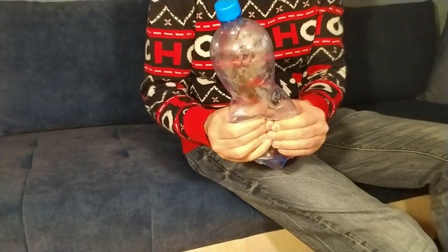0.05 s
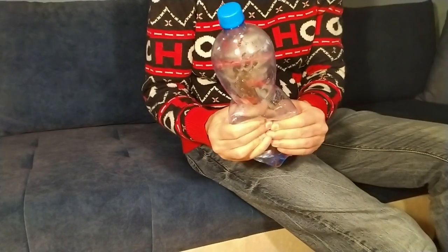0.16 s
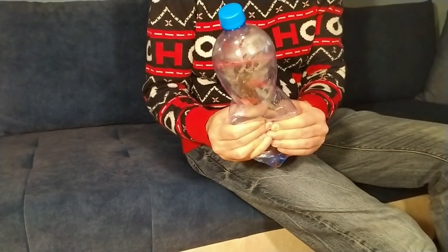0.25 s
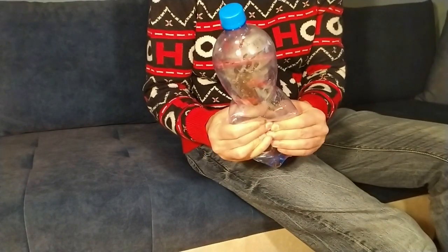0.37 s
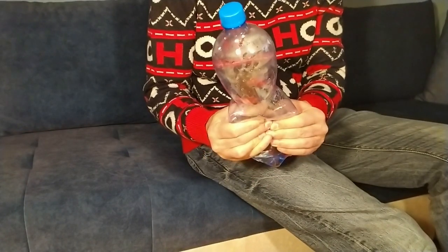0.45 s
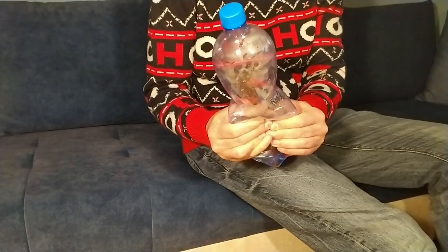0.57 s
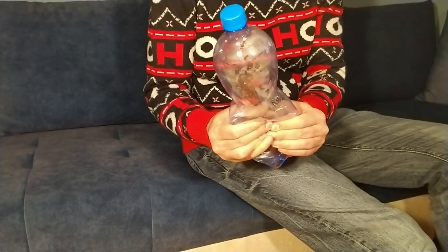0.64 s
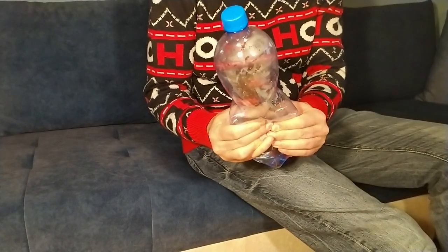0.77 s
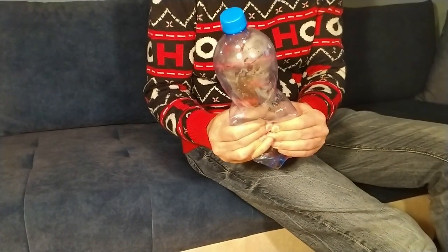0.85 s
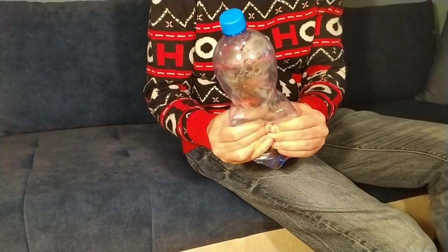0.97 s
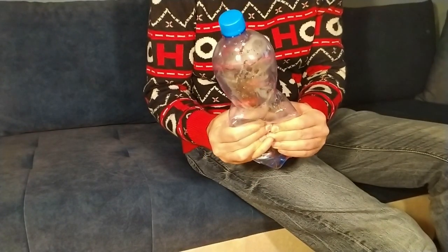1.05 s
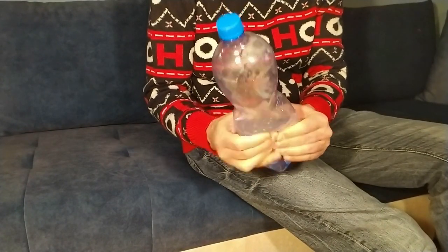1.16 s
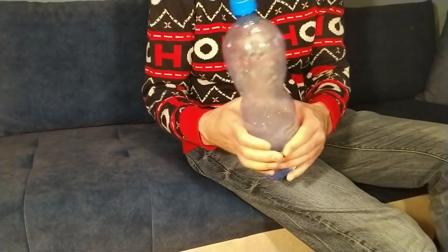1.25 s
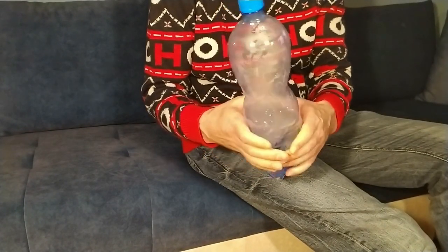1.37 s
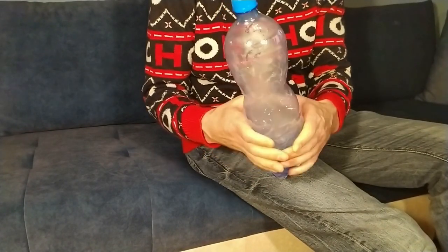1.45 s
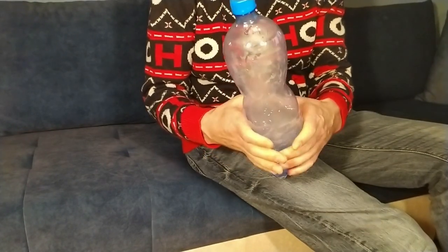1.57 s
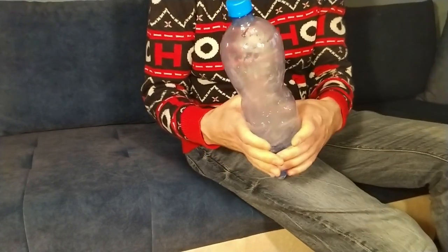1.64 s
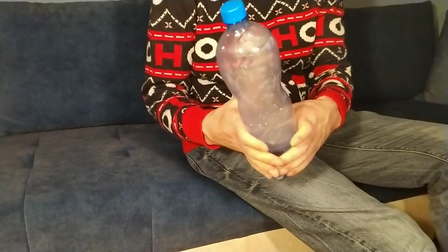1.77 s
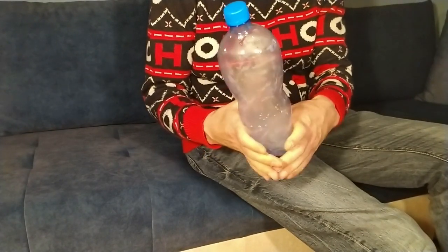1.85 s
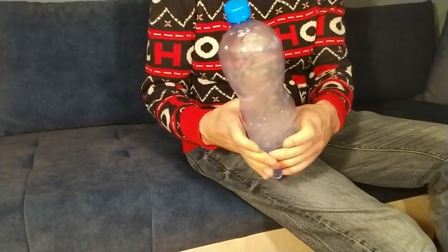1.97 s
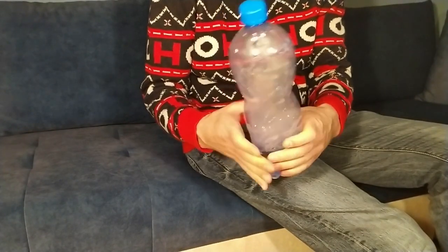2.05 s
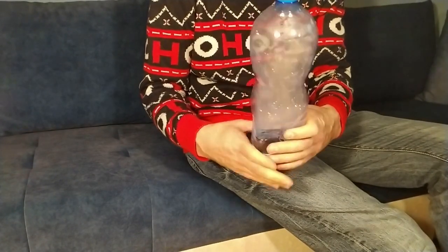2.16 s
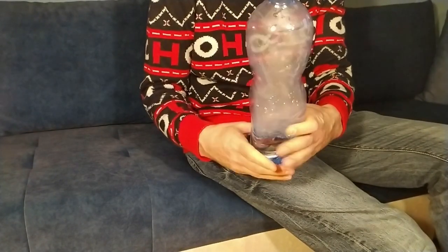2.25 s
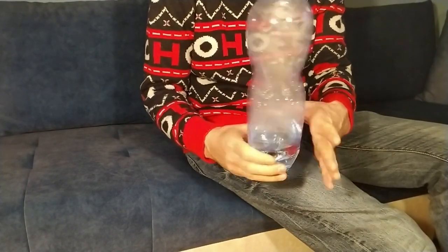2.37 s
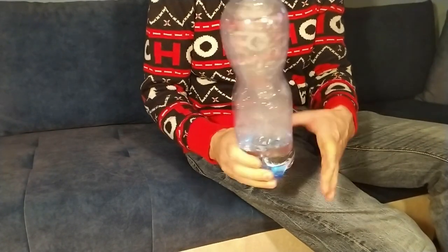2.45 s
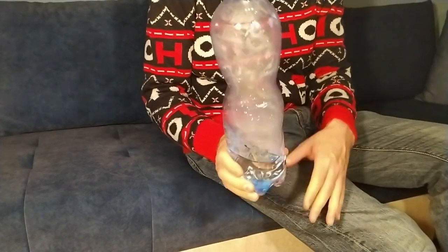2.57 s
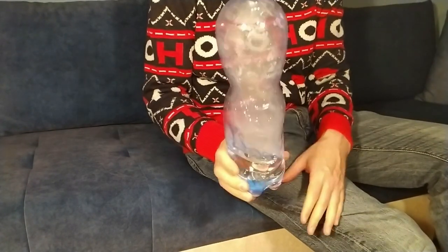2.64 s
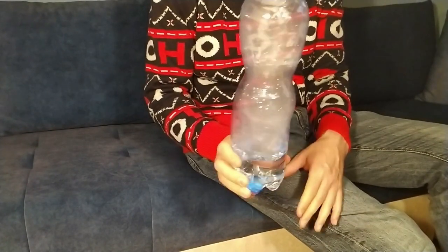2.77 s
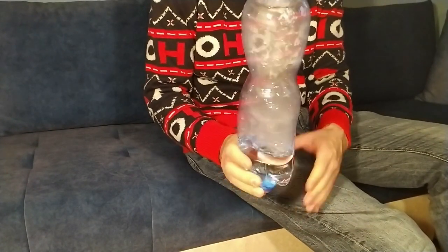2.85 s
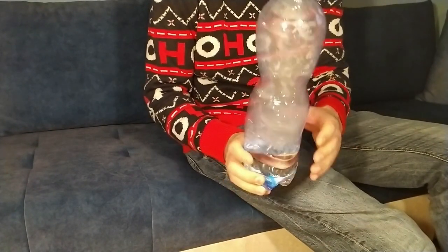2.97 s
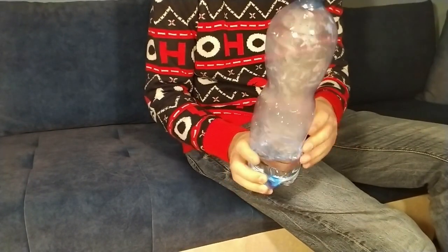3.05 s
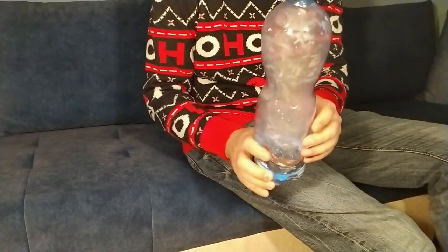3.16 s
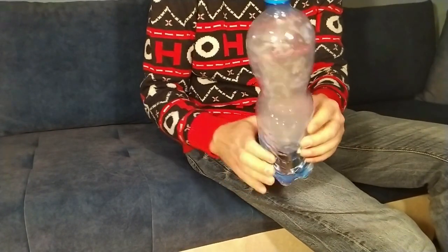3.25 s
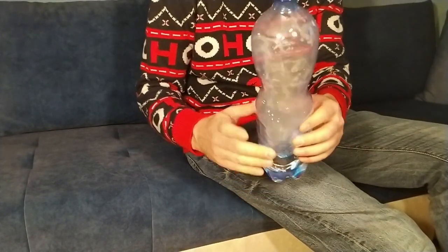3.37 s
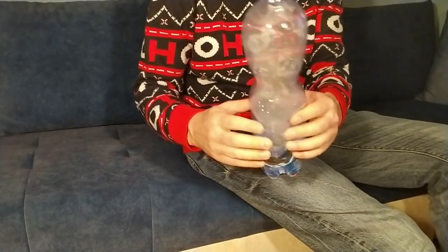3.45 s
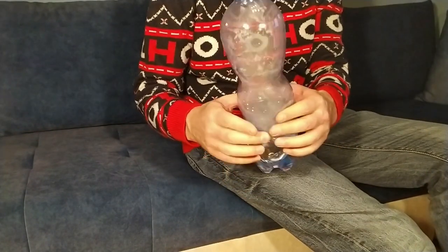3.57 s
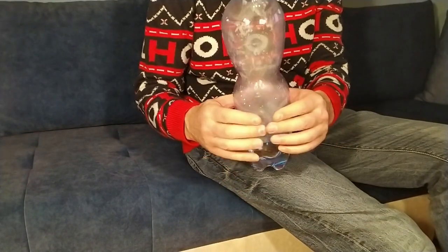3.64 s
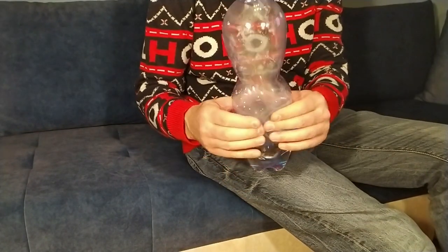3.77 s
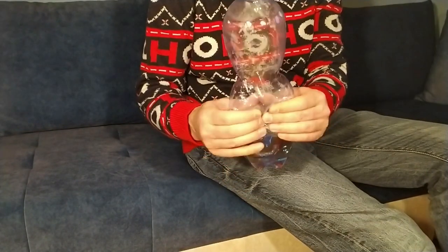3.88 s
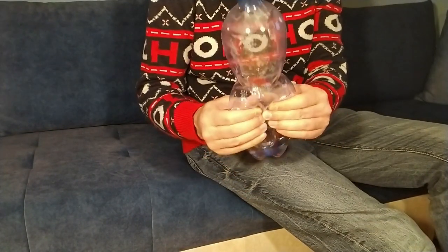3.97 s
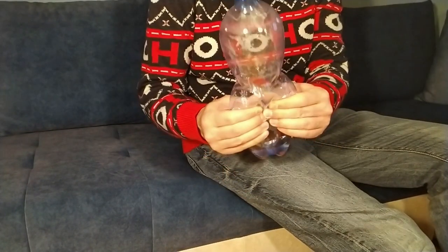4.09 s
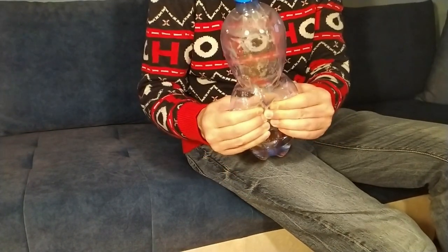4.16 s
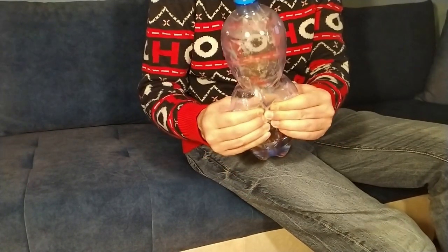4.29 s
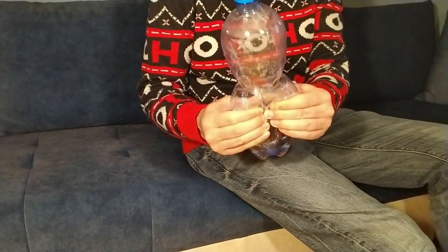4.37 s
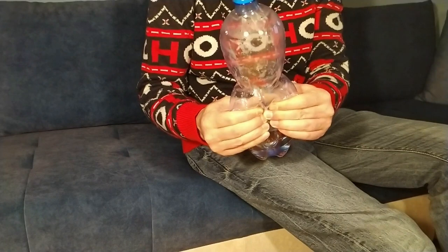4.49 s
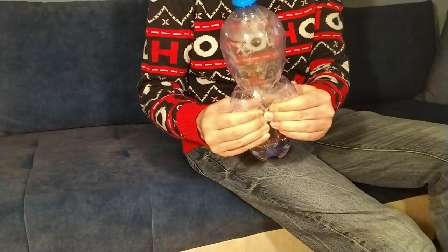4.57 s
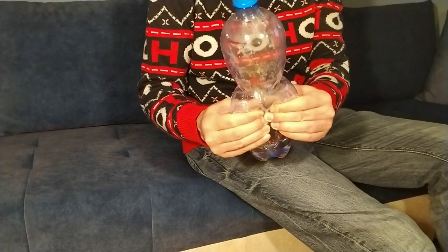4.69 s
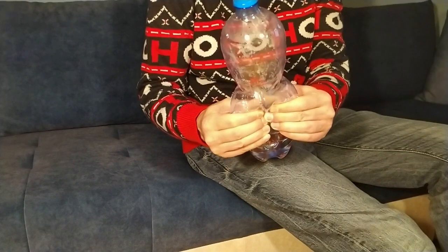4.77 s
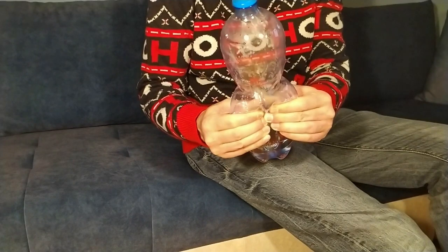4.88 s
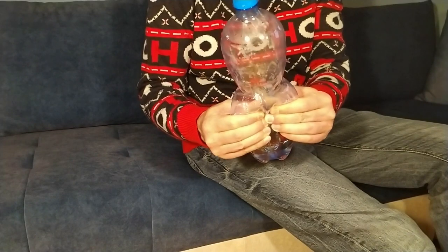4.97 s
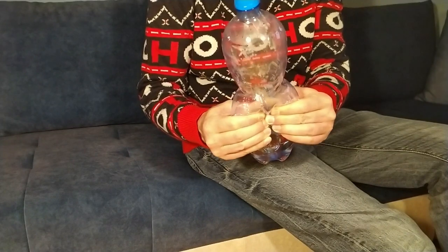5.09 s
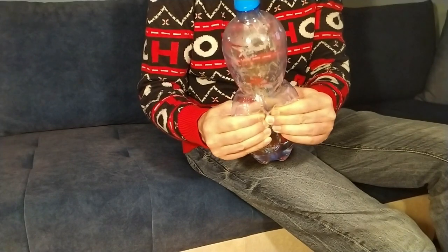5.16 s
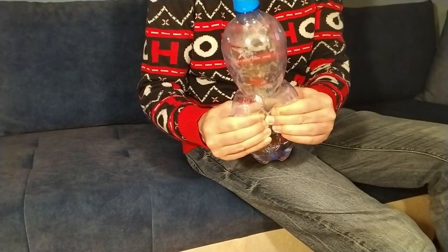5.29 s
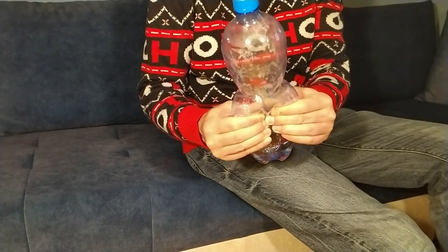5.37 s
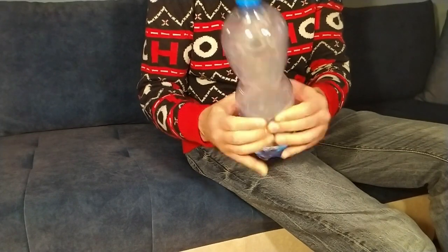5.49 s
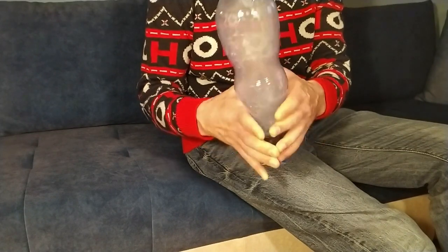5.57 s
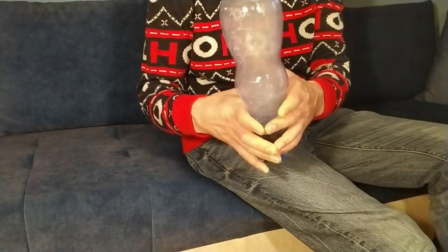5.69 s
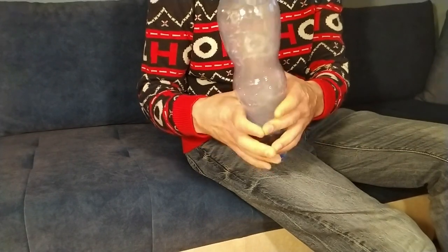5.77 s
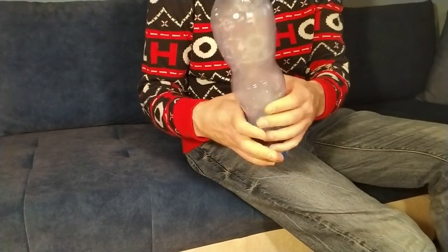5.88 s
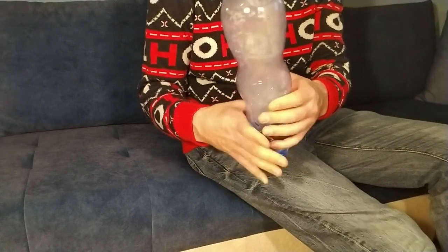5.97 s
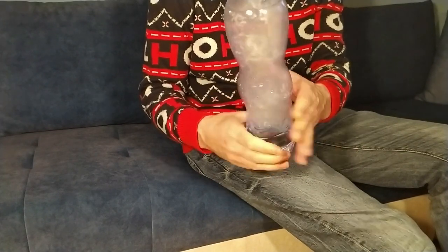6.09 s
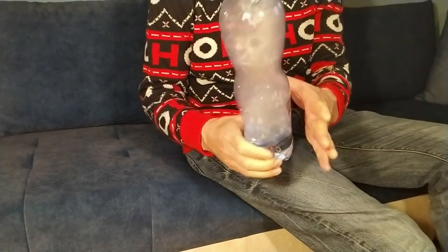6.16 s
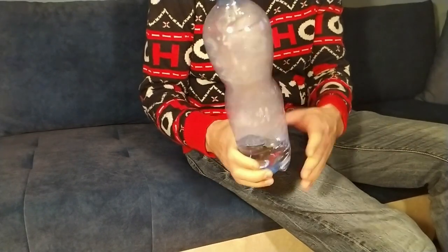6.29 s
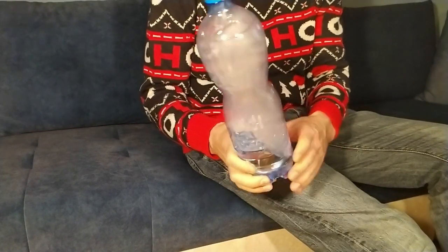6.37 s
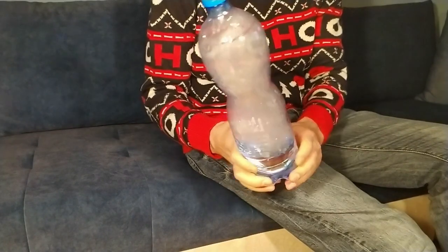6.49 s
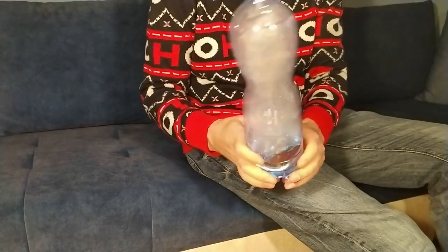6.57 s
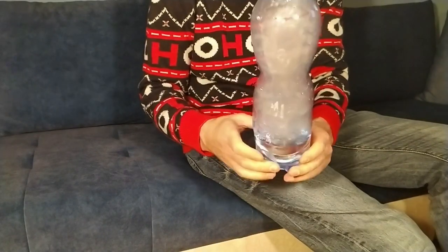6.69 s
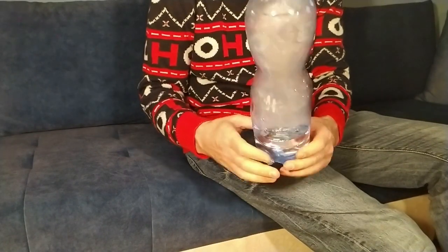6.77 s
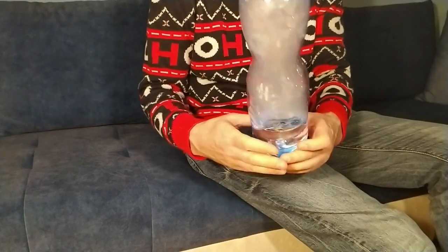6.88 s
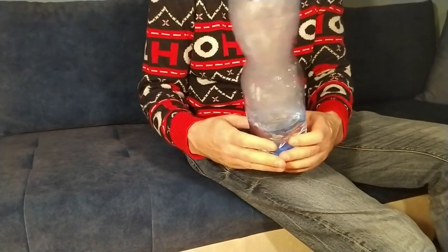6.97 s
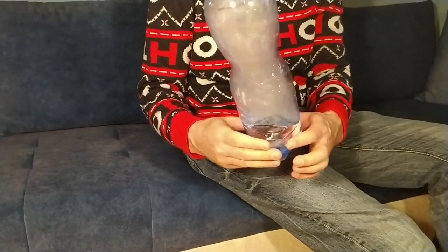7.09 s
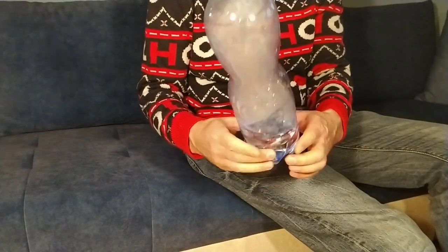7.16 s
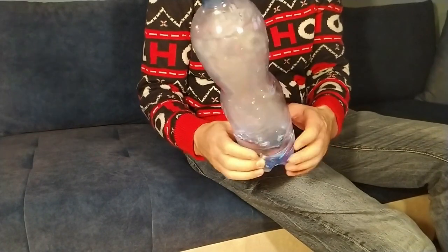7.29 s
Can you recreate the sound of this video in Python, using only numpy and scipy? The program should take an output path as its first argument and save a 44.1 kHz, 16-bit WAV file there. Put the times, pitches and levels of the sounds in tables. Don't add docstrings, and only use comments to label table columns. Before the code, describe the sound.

A thin plastic bottle is worked by two hands in a small furnished room, about a metre from stereo microphones. It starts mid-squeeze with sharp cracks and knocks at 0-0.17 seconds, then near silence with faint rumble and hiss. At 1.2-1.36 a dense, loud burst of bright snaps, ringing plastic and hollow thumps springs out; a second, deeper popping cluster comes at 1.82-2.07. From 2.3 to 3.1 only faint taps, ticks and skin rubs. The second squeeze cracks at 3.25, then crunches quickly through 3.65-4.02, with small ticks to 4.18. A quiet hold follows, with a soft rub near 4.47. At 5.5-5.64 a tight, very loud release crackles and booms, ending on a piercing snap. Light ticks and taps scatter from 5.9 to 7.0, then one sharp late pop at 7.07 and a smaller click at 7.23. Each burst leaves a short bright room tail.

```python
import sys
import numpy as np
from scipy import signal
from scipy.fft import rfft, irfft, next_fast_len
from scipy.io import wavfile

SR = 44100
rng = np.random.default_rng(int(sys.argv[2]) if len(sys.argv) > 2 else 0)


def ratio(d):
    e = np.asarray(d, float) / 20
    return 10 ** e


def to_wav(s):
    ch = np.atleast_2d(s).T
    pcm = np.round(np.clip(ch, -1, 1) * 32767)
    wavfile.write(sys.argv[1], SR, pcm.astype(np.int16))


N = 323253


def along(points, hz):
    f, v = np.transpose(points)
    return np.interp(np.log(hz + 1), np.log(f + 1), v)


def filtered(x, response):
    n = x.shape[-1]
    m = next_fast_len(n + 8192)
    return irfft(rfft(x, m) * response(np.fft.rfftfreq(m, 1 / SR)), m)[..., :n]


def paired(pair, alike):
    def mid_side_gain(hz):
        turn = np.arccos(np.clip(along(alike, hz), -1, 1)) / 2
        return np.array([np.cos(turn), np.sin(turn)])
    mid, side = filtered(pair, mid_side_gain)
    return np.array([mid + side, mid - side])


def scattered(low_hz, high_hz, rows, count):
    place = (np.arange(count) + rng.random((rows, count))) / count
    return low_hz * (high_hz / low_hz) ** place


def led_by(pitch, hz, slope_db, lead_db, cycles, lead_cycles):
    hz = np.column_stack([pitch, hz])
    weight = ratio(-slope_db * np.abs(np.log2(hz / pitch[:, None])))
    weight[:, 0] = ratio(lead_db)
    return hz, weight, np.r_[lead_cycles, np.full(hz.shape[1] - 1, cycles)]


def waves(s, level_db, hz, weight, travel, cycles, sag, apart, rise, size):
    lead_s = .001
    chance = rng.random(hz.shape + (4,))
    arrival = travel * np.sqrt(1000 / hz) * (chance[..., 0] + .5)
    life = cycles / hz * (chance[..., 1] + .5)
    t = np.float32(np.clip(np.arange(size) / SR - arrival[..., None], 0, None))
    hz, life, chance = np.float32(hz), np.float32(life), np.float32(chance)
    age = t / life[..., None]
    swell = (age * np.exp(1 - age)) ** rise
    glide = sag * (life[..., None] * (1 - np.exp(-age)))
    phase = 2 * np.pi * (hz[..., None] * (t + glide) + chance[..., 2:3])
    skew = apart * (chance[..., 3:] - .5)
    weight = weight / np.linalg.norm(weight, axis=1, keepdims=True) * ratio(level_db)[:, None]
    start = np.round(np.clip(s - lead_s, 0, None) * SR).astype(int)
    where = (start[:, None] + np.arange(size)).ravel()
    out = np.zeros((3, 2, N))
    for ear, sign in enumerate((1, -1)):
        packets = weight[..., None] * swell * np.sin(np.float32(phase + sign * skew))
        for k in range(3):
            burst = packets[:, k::3].sum(1).ravel()
            out[k, ear] = np.bincount(where, burst, N + size)[:N]
    return out


# f/Hz, density/dB
AIR_SPECTRUM = [(12, -37.5), (20, 2), (38, -17), (107, -18.5), (177, -24), (262, -23.5), (301, -27),
                (678, -35.5), (1290, -41.5), (3840, -50), (10500, -51), (16000, -58.5)]
# f/Hz, likeness/1
AIR_LIKENESS = [(60, 0.079), (380, 0.14), (2380, 0.011), (15000, 0.024)]


def air():
    noise = filtered(rng.standard_normal((2, N)), lambda hz: ratio(along(AIR_SPECTRUM, hz)))
    noise = paired(noise, AIR_LIKENESS)
    return ratio(-67.5 + 4.5) * noise / np.sqrt(np.mean(noise ** 2))


# f/Hz, t60/s
ROOM_T60 = [(100, 0.11), (300, 0.31), (1000, 0.21), (4000, 0.32), (12000, 0.27)]
# f/Hz, level/dB
ROOM_TINT = [(100, -6), (300, -0.5), (1000, -1), (3000, 1), (6000, -1), (10000, 5), (14000, -5.5)]
# f/Hz, likeness/1
ROOM_LIKENESS = [(60, 0.35), (200, 0.2), (550, 0.8), (1600, 0.072), (15000, .01)]


def room(groups):
    poses = 12
    wall_s, early_db, echo_gain, echo_s = 0.0098, 1.5, 0.35, 0.0072
    wet, hop = np.zeros((2, N + SR)), N // poses + 1
    noise = rng.standard_normal((len(groups) * poses, 2, SR * 2 // 5))
    hz, t, z = signal.stft(noise, SR, nperseg=256)
    decay_db = along(ROOM_TINT, hz)[:, None] - 60 * t / along(ROOM_T60, hz)[:, None]
    tails = signal.istft(z * ratio(decay_db), SR, nperseg=256)[1]
    age = np.arange(tails.shape[-1]) / SR
    early = ratio(early_db) * np.sqrt(age / wall_s)
    late = 1 + echo_gain * np.exp(-np.abs(age - wall_s - .003) / echo_s)
    shape = np.where(age < wall_s, early, late)
    for k, tail in enumerate(tails * shape / np.sqrt(SR * .02)):
        start = k % poses * hop
        answer = signal.fftconvolve(groups[k // poses, :1, start:start + hop], tail, axes=1)
        wet[:, start:start + answer.shape[1]] += answer
    return paired(wet[:, :N], ROOM_LIKENESS)


# t/s, length/s, level/dB, centre f/Hz, width/octaves
SKIN_RUBS = [(2.2, 0.083, -81.5, 8840, 1.6), (2.726, 0.095, -90.5, 9900, 0.37),
             (2.943, 0.045, -89, 10000, 0.27), (3.06, 0.052, -88, 10760, 0.26),
             (3.006, 0.057, -80.5, 1406, 0.75), (4.474, 0.052, -65.5, 1896, 0.19),
             (4.476, 0.06, -57.5, 480, 1.01), (2.361, 0.034, -72.5, 8000, 1.8),
             (6.132, 0.028, -63, 6920, 3.1), (6.57, 0.038, -74, 858, 0.69),
             (6.688, 0.039, -82.5, 1290, 1.02), (6.69, 0.028, -86, 8460, 0.68)]


def fingers():
    out = np.zeros(N + SR)
    for s, length_s, db, centre_hz, octaves in SKIN_RUBS:
        age = np.arange(SR // 4) / SR / (length_s / 3)
        hiss = filtered(rng.standard_normal(len(age)),
                        lambda hz: np.exp(-.5 * (np.log2((hz + 1) / centre_hz) / octaves) ** 2))
        out[round(s * SR):][:len(age)] += ratio(db) * age * np.exp(1 - age) * hiss / hiss.std()
    return out[:N]


# t/s, level/dB, f/Hz
BELLY_THUMPS = [(1.321, -33.5, 95), (1.341, -30, 139), (1.838, -40.5, 108.6), (1.867, -53, 158),
                (2.058, -46, 127), (5.517, -43, 119), (3.34, -50, 136), (2.831, -55, 113.3),
                (3.859, -52, 61.8), (5.569, -36.5, 94), (5.634, -50, 102.3)]


def belly():
    out, t = np.zeros(N + SR), np.arange(SR // 5) / SR
    for s, db, hz in BELLY_THUMPS:
        age = t * hz / 1.4
        swell = (age * np.exp(1 - age)) ** 2
        out[round(s * SR):][:len(t)] += ratio(db + 10.5) * swell * np.sin(2 * np.pi * hz * t)
    return out[:N]


# crest t/s, level/dB, f/Hz, rise/cycles
TAUT_PINGS = [(0.0009, -21, 1200, 0.98), (0.0055, -22.5, 680, 1.8), (0.051, -20.5, 1710, 1.3),
              (0.056, -19.5, 687, 1.8), (0.131, -43, 2637, 4.3), (0.133, -32.5, 749, 2.8),
              (0.154, -29.5, 775.7, 2.5), (1.0122, -54, 1291, 1.2), (1.0157, -43.5, 669.7, 2.1),
              (1.016, -47, 325, 1.9), (1.2585, -14, 763, 2.2), (1.2859, -15.5, 2260, 1.5),
              (1.3278, -18, 495.4, 1.5), (1.3452, -16.5, 1601, 1.5), (1.6321, -33.5, 1293, 3),
              (1.6311, -42, 2366, 3.5), (1.6354, -38.5, 793, 1.5), (1.843, -8, 415.5, 0.9),
              (1.8468, -9.5, 454, 0.82), (3.1251, -30, 1380, 2.5), (3.126, -46, 2740, 2.5),
              (3.1282, -26, 836, 2.37), (3.129, -30.5, 463, 1.6), (3.7702, -16, 1400, 0.79),
              (3.8202, -14.5, 1290, 0.83), (3.891, -17, 1300, 0.85), (3.8957, -16.5, 900, 2.5),
              (3.9441, -17, 1124, 0.93), (4.1177, -30, 2324, 1.1), (4.122, -29.5, 693, 3),
              (5.565, -16, 1809, 1.3), (5.5703, -13.5, 1311, 1.5), (5.573, -12, 444.5, 1.7),
              (5.588, -12.5, 399, 1.6), (5.598, -12, 1500, 0.9), (5.9132, -39, 910, 3.8),
              (5.9435, -45, 333, 1.2), (6.0525, -44, 750, 2.1), (6.122, -36, 960, 1.88),
              (6.1475, -41.5, 2210, 4.3), (6.369, -34.5, 1148, 2.1), (6.7535, -42, 599, 1.16),
              (7.0175, -37, 500, 1.7), (7.0765, -15, 543, 2.35), (7.097, -25.5, 503, 1.9)]


def pings():
    sag = 0.11
    out, t = np.zeros(N + SR), np.arange(SR // 25) / SR
    for s, db, hz, cycles in TAUT_PINGS:
        life = cycles / hz
        age = t / life
        swell = (age * np.exp(1 - age)) ** 2.3
        phase = 2 * np.pi * (hz * (t - life) - sag * cycles * (age - 1) ** 2 / 2)
        out[max(round((s - life) * SR), 0):][:len(t)] += ratio(db) * swell * np.cos(phase)
    return out[:N]


# t/s, level/dB, f/Hz
FACET_KNOCKS = [(0.0, -24, 1200), (0.0527, -29, 2730), (1.2276, -24.5, 782), (1.2396, -29.5, 2400),
                (1.2413, -20.5, 680), (1.2516, -22.5, 2570), (1.2556, -25.5, 776), (1.264, -27.5, 2570),
                (1.2792, -26, 1200), (1.314, -21, 1130), (1.837, -29.5, 1334), (1.845, -34.5, 2200),
                (1.888, -26, 1380), (1.8953, -25.5, 1010), (2.0506, -32.5, 1368), (2.38, -42.5, 532),
                (3.2506, -19.5, 1297), (3.2565, -20, 775), (3.328, -40.5, 1030), (3.3425, -33.5, 2350),
                (3.3675, -45, 2150), (3.498, -41.5, 1217), (3.7254, -37, 1640), (3.7738, -27.5, 707),
                (3.804, -38.5, 2410), (3.8177, -22.5, 774), (3.8203, -27, 1644), (3.834, -26, 620),
                (3.8533, -37.5, 2800), (3.8611, -31.5, 2323), (3.8742, -35, 2427), (3.9433, -25, 1214),
                (3.9708, -29, 779), (5.505, -29.5, 2610), (5.5147, -24, 2520), (5.523, -23.5, 2420),
                (5.5202, -24.5, 692), (5.57, -27.5, 2710), (5.566, -22.5, 1440), (5.596, -27, 1450),
                (5.604, -20.5, 947), (5.6351, -24.5, 2430), (5.6456, -37, 3530), (6.125, -46, 591),
                (6.1476, -38.5, 579), (6.376, -40, 1119), (7.072, -17, 2585), (7.0713, -13.5, 1403),
                (7.2275, -35, 2180), (7.2275, -26, 1264)]


def knocks():
    s, level_db, pitch = np.transpose(FACET_KNOCKS)
    hz = pitch[:, None] * 2 ** (np.array([-.08, 0, .08]) + 0.011 * rng.standard_normal((len(s), 3)))
    return waves(s, level_db + 3.5, hz, np.ones(hz.shape) * [.4, 1, .4], travel=.0004, cycles=2.8,
                 sag=0.019, apart=0.65, rise=2.1, size=1200).sum(0)


# t/s, level/dB, f/Hz
RIDGE_CRACKS = [(0.0147, -44, 2920), (0.0224, -44.5, 9770), (0.1284, -37.5, 10040), (0.1299, -40.5, 2576),
                (0.149, -47.5, 4500), (1.2529, -34, 10200), (1.2651, -34, 8220), (1.2648, -32.5, 5560),
                (1.281, -29, 8480), (1.2917, -36.5, 9990), (1.3185, -30.5, 3790), (1.3456, -34, 7970),
                (1.3455, -31, 4513), (1.3556, -37.0, 10210), (1.7681, -42.5, 2435), (1.8365, -38, 4480),
                (1.8384, -35.5, 9990), (1.8479, -41.5, 5630), (1.8537, -39.5, 5536), (1.8544, -38.5, 9330),
                (1.8849, -32.5, 5896), (1.9012, -38.5, 9710), (1.9884, -40.5, 2480), (1.9988, -33.5, 5630),
                (2.0126, -34.5, 6000), (2.0134, -30.5, 2423), (2.0221, -47, 4360), (2.055, -54, 9320),
                (3.2527, -34.5, 9750), (3.344, -44, 2410), (3.3518, -44, 6100), (3.357, -41, 9700),
                (3.6866, -50, 8440), (3.7162, -50, 6190), (3.796, -35, 4650), (3.82, -38.5, 8660),
                (3.8206, -38, 6524), (3.861, -29, 8080), (3.8608, -23.5, 9750), (3.8914, -33, 4600),
                (3.9061, -37, 9650), (3.9576, -28.5, 9770), (3.9643, -29.5, 2580), (3.9752, -48, 6370),
                (3.9746, -35, 2915), (5.5048, -27.5, 2580), (5.5444, -33.5, 7940), (5.5576, -38, 9845),
                (5.567, -34, 8365), (5.5674, -33.5, 9760), (5.5732, -35.0, 7814), (5.5983, -31, 9910),
                (5.6036, -34.5, 7760), (5.6103, -36.5, 6217), (5.6293, -18, 3945), (7.0821, -49.5, 9650),
                (7.0841, -32.5, 6860), (7.2273, -45, 4440)]


def cracks():
    s, level_db, pitch = np.transpose(RIDGE_CRACKS)
    hz = pitch[:, None] * 2 ** (np.array([-.2, 0, .2]) + 0.021 * rng.standard_normal((len(s), 3)))
    return waves(s, level_db + 6.5, hz, np.ones(hz.shape), travel=.0004, cycles=5.0,
                 sag=.02, apart=2.2, rise=2.1, size=400)


def snaps(s, snap_db, ring_db):
    hz = scattered(3000, 16000, len(s), count=36)
    tilt_db = np.clip(0.56 * (snap_db - ring_db) + 0.5, -9, 5)
    weight = ratio(tilt_db[:, None] * np.log2(hz / 6000))
    return waves(s, snap_db - 1.5, hz, weight, travel=.0014, cycles=4.5,
                 sag=0.13, apart=np.pi, rise=1.2, size=330)


def wall_rings(s, ring_db, ring_hz, snap_db):
    hz, weight, cycles = led_by(ring_hz, scattered(571.7, 3300, len(s), count=14), slope_db=-0.5,
                                lead_db=3.0, cycles=2.22, lead_cycles=4)
    weight = weight / (1 + (hz / 2900) ** 6)
    slow_db = np.clip(0.66 * (snap_db - ring_db + 10.0), -7, 0)
    faint_db = np.clip(0.34 * (ring_db + 42.5), -6, 0)
    octaves_up = np.clip(np.log2(hz / ring_hz[:, None]), 0, None)
    weight = weight * ratio((slow_db + faint_db)[:, None] * octaves_up)
    ring = waves(s, ring_db + 4.0, hz, weight, travel=0.00072, cycles=cycles * (hz / 1300) ** 0.41,
                 sag=0.13, apart=np.pi / 2, rise=1.6, size=950)
    return signal.sosfilt(signal.butter(4, 3200, fs=SR, output='sos'), ring)


def hollow_pops(s, pop_db, pop_hz):
    hz, weight, cycles = led_by(pop_hz, scattered(140, 600, len(s), count=5), slope_db=8.0,
                                lead_db=4.0, cycles=1.5, lead_cycles=1.6)
    return waves(s, pop_db + 7.5, hz, weight, travel=.0018, cycles=cycles,
                 sag=0.058, apart=0.22, rise=1.8, size=2400)


# t/s, ring level/dB, ring f/Hz, snap level/dB
SQUEEZE_1 = [(0.0001, -20.5, 684, -21), (0.02, -40.5, 1410, -35), (0.035, -25.5, 705, -34.5),
             (0.0503, -23, 1680, -30.5), (0.066, -42.5, 1790, -44), (0.128, -41.5, 1026, -33.5),
             (0.149, -36, 777, -49)]
# t/s, ring level/dB, ring f/Hz, snap level/dB
RELEASE_1 = [(1.2166, -26.5, 667, -62), (1.2188, -24, 2512, -45.5), (1.2393, -20.5, 872.6, -40.5),
             (1.2525, -16, 898, -17.5), (1.2645, -35.5, 1123, -20), (1.2806, -26, 2046, -10.5),
             (1.2854, -19.5, 2438, -40.5), (1.298, -30, 2730, -26.5), (1.3142, -16, 888, -39.5),
             (1.328, -22.5, 2323, -26), (1.3445, -22.5, 1556, -21), (1.3551, -35.5, 2400, -30.5),
             (1.6315, -39, 1249, -66.5), (1.744, -38, 1336, -54.5), (1.7686, -43.5, 1392, -56),
             (1.8224, -30.5, 2223, -29.5), (1.84, -20.5, 1432, -23), (1.85, -30, 709, -23),
             (1.862, -31.5, 1239, -32.5), (1.8736, -22, 1536, -19), (1.8827, -16, 1097, -21.5),
             (1.89, -22.5, 986, -22), (1.905, -33, 695, -26.5), (1.949, -34, 1044, -68),
             (1.9889, -32.5, 1100, -22), (1.9983, -39, 1790, -30.5), (2.0121, -24.5, 2240, -31.5),
             (2.0204, -25, 1500, -26.5), (2.047, -29, 1513, -41.5), (2.055, -26, 681.5, -57)]
# t/s, ring level/dB, ring f/Hz, snap level/dB
SQUEEZE_2 = [(3.1107, -53.5, 1510, -58), (3.1239, -36.5, 892, -67), (3.2262, -31, 850, -33.5),
             (3.2503, -15, 1215, -20), (3.27, -32.5, 810, -45.5), (3.3, -53, 2090, -42.5),
             (3.3281, -30, 985, -83), (3.3425, -40, 2250, -27), (3.6511, -32, 937, -47),
             (3.6851, -28.5, 1330, -32), (3.6943, -26, 1235, -39.5), (3.7167, -29, 2580, -37.5),
             (3.7712, -29, 1710, -39.5), (3.7967, -26.5, 2630, -21), (3.809, -39.5, 1260, -25),
             (3.819, -22, 1626, -26), (3.852, -30.5, 1500, -28.5), (3.8605, -24, 1220, -12.5),
             (3.874, -21.5, 1007, -27), (3.89, -23.5, 1057, -21.5), (3.9057, -37, 1160, -28),
             (3.942, -21.5, 990, -51), (3.957, -27.5, 1280, -24.5), (3.9637, -23.5, 762, -23.5),
             (3.977, -25, 862, -30.5), (4.007, -31.5, 1064, -39.5), (4.012, -23, 712, -38),
             (4.117, -34, 1050, -45), (4.13, -52, 1740, -61), (4.183, -60, 917, -56)]
# t/s, ring level/dB, ring f/Hz, snap level/dB
RELEASE_2 = [(5.489, -44.5, 1526, -55), (5.5024, -18.5, 1108, -37), (5.5143, -17, 1130, -36.5),
             (5.5204, -19, 694, -37), (5.5368, -25, 715.3, -29), (5.544, -34, 1029, -21.5),
             (5.556, -23, 1100, -22), (5.5644, -16, 1427, -14.5), (5.571, -18, 1719, -30),
             (5.58, -19, 1001, -30.5), (5.588, -19, 869, -37), (5.5976, -19.5, 1390, -13.5),
             (5.604, -27, 924.7, -33), (5.615, -36, 721, -37), (5.6299, -14, 1500, -8),
             (5.6343, -14.5, 2350, -28), (7.0706, -17.5, 1453, -17), (7.0723, -27.5, 2565, -52.5),
             (7.213, -25.5, 1070, -77), (7.227, -27, 1180, -48.5)]
# t/s, ring level/dB, ring f/Hz, snap level/dB
SLACK_TICKS = [(2.3698, -47.5, 1025, -62), (2.391, -63, 746, -62), (2.7707, -43.5, 1089, -69.5),
               (2.952, -76, 2019, -72), (3.033, -63, 2190, -67.5), (6.0488, -46, 860, -60.5),
               (6.0609, -71, 1090, -62), (6.1182, -36, 1030, -62), (6.1409, -41.5, 1100, -48),
               (6.145, -39, 2120, -71), (6.163, -42, 1720, -59.5), (6.1816, -56, 1380, -75),
               (6.4297, -53.5, 1170, -67.5), (6.718, -63, 2320, -74), (6.9235, -64.5, 1170, -68)]
# t/s, ring level/dB, ring f/Hz
SLOW_CREASES = [(0.082, -42, 670), (0.17, -42.5, 2430), (1.0115, -66, 1000), (1.1805, -63.5, 2280),
                (1.632, -52, 2340), (1.7692, -43, 2520), (1.963, -36.5, 1320), (2.0679, -34, 854),
                (2.3064, -51, 993), (2.798, -62.5, 681), (3.37, -38, 2010), (3.4727, -49.5, 1230),
                (3.4991, -46, 1304), (3.5237, -51.5, 1160), (3.6217, -45.5, 800), (3.6613, -35.5, 835),
                (3.73, -41, 1524), (3.7828, -62, 790), (4.102, -42.5, 597), (5.9084, -47, 952),
                (5.9383, -57, 923), (5.9607, -50.5, 847), (6.3677, -44.5, 1083), (6.39, -49.5, 1140),
                (6.469, -57.5, 1020), (6.708, -62, 1145), (6.748, -53, 823), (6.812, -58.5, 717),
                (7.011, -45.5, 1072), (7.1972, -36, 1000)]
# t/s, pop level/dB, pop f/Hz
PANEL_FLIPS = [(0.0001, -30.5, 554.5), (0.035, -27.5, 250), (1.2068, -29.5, 355.5), (1.2401, -26, 289),
               (1.288, -26.5, 250), (1.326, -21.5, 338.2), (1.3464, -31, 291.3), (1.831, -28, 438),
               (1.8384, -28, 486), (1.85, -19, 252), (1.854, -24, 290.2), (1.905, -34, 362.4),
               (2.048, -26.5, 353), (3.239, -34.5, 439), (3.2528, -25, 396), (3.3, -32, 361.3),
               (3.362, -31.5, 373), (3.6502, -30.5, 590.6), (3.6879, -33, 430.7), (3.82, -40.5, 384),
               (4.034, -58, 274.5), (5.57, -24, 479.8), (5.58, -23, 389), (5.587, -25.5, 296),
               (5.604, -23, 390.2), (5.638, -21, 235.3), (7.07, -35, 487.8), (7.243, -34, 217.2)]
# t/s, pop level/dB, pop f/Hz
FAINT_PANEL_FLIPS = [(1.012, -57, 618), (1.561, -53.5, 237), (1.713, -47.5, 240), (2.275, -57.5, 397),
                     (2.342, -55, 270), (2.369, -45, 620), (2.39, -51.5, 285), (2.7694, -51, 491),
                     (3.0341, -54, 184), (3.1121, -48.5, 328), (3.219, -43.5, 513), (5.9406, -55.5, 248),
                     (6.014, -58, 279.6), (6.0607, -47.5, 278), (6.08, -43, 155), (6.3328, -55, 461.4),
                     (6.345, -42.5, 266), (6.155, -40.5, 360), (6.429, -47, 257), (6.751, -58.5, 469),
                     (6.522, -56.5, 384), (6.588, -57.5, 400.4), (6.772, -63.5, 242), (6.924, -51, 226),
                     (6.949, -58.5, 241), (7.028, -43, 470), (7.0555, -45.5, 470)]


def bottle():
    def belly_hz(s):
        return rng.uniform(250, 481, len(s))

    def wall_hz(s):
        return rng.uniform(730, 1500, len(s))

    # t/s, ring level/dB, ring f/Hz, pop level/dB, pop f/Hz, snap level/dB
    s, db, hz, snap_db = np.vstack([SQUEEZE_1, RELEASE_1, SQUEEZE_2, RELEASE_2, SLACK_TICKS]).T
    dents = [s, db, hz, db - 9, belly_hz(s), snap_db]
    s, db, hz = np.transpose(SLOW_CREASES)
    creases = [s, db, hz, db - 6.5, belly_hz(s), db - 44.5]
    s, db, hz = np.transpose(PANEL_FLIPS)
    panels = [s, db - 13.5, wall_hz(s), db, hz, db - 37]
    s, db, hz = np.transpose(FAINT_PANEL_FLIPS)
    faint_panels = [s, db - 13.5, wall_hz(s), db, hz, db - 41.5]
    s, ring_db, ring_hz, pop_db, pop_hz, snap_db = np.hstack([dents, creases, panels, faint_panels])
    snap = snaps(s, snap_db, ring_db)
    ring = wall_rings(s, ring_db, ring_hz, snap_db)
    return snap + ring + hollow_pops(s, pop_db, pop_hz)


# f/Hz, level/dB
CAPSULE_COLOUR = [(60, -12), (200, -10.5), (3000, 3), (6000, 5.5), (9500, 10), (10800, 8), (12400, -9.5),
                  (15000, -4.5), (16500, -38)]


def scene():
    crack_room_db, ping_room_db = -8.5, -3.5
    groups, ridges, notes = bottle(), cracks(), pings()
    groups[0] += belly()
    groups[1] += fingers()
    sent = groups + ratio(crack_room_db) * ridges
    sent[2] += ratio(ping_room_db) * notes
    sound = (groups + ridges).sum(0) + notes + room(sent) + knocks()
    return filtered(sound, lambda hz: ratio(along(CAPSULE_COLOUR, hz))) + air()


def roll_off(x):
    return signal.sosfilt(signal.butter(12, 16510, fs=SR, output="sos"), x)


# f/Hz, left-right level/dB
PORT_SHADE = [(60, 3), (180, 4.5), (550, 4.5), (1650, 0.5), (4970, -3), (15000, -2)]


def record(dry):
    shaded = filtered(dry, lambda hz: ratio(np.outer([.5, -.5], along(PORT_SHADE, hz))))
    limited = shaded / (1 + np.abs(shaded / .8) ** 4) ** (1 / 4)
    return roll_off(limited)


dry = scene()
out = record(dry)
to_wav(out)
```